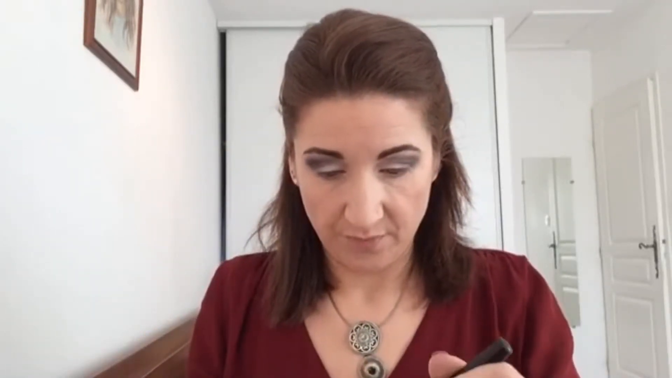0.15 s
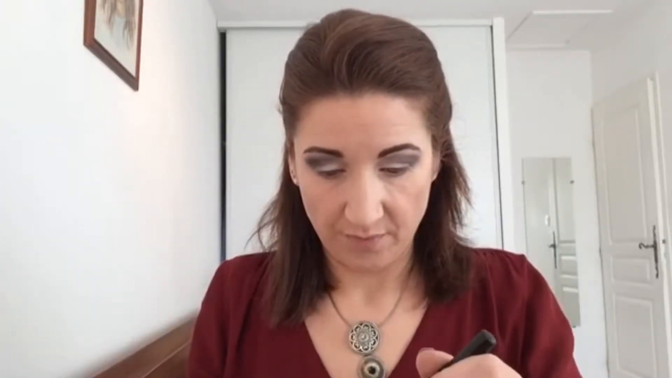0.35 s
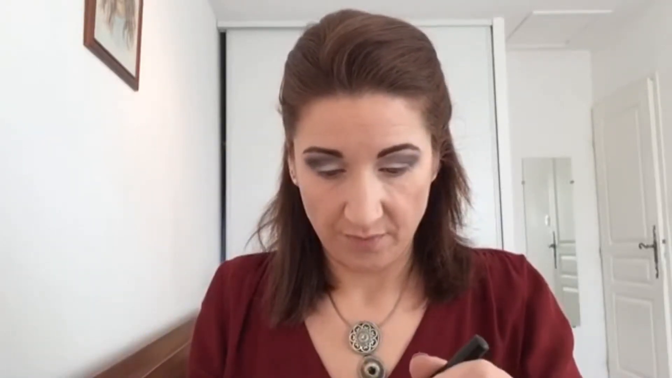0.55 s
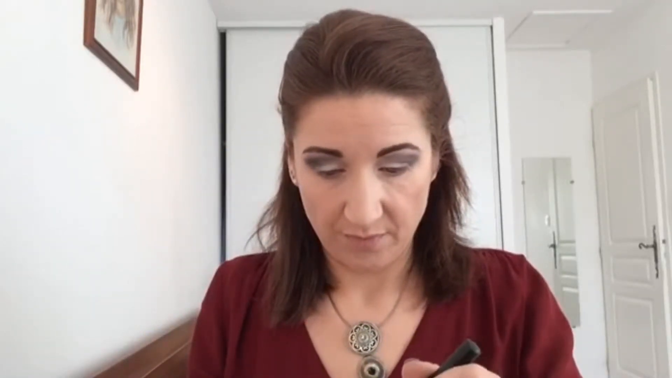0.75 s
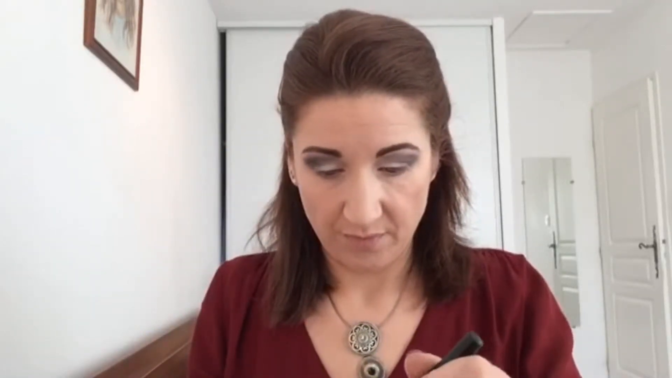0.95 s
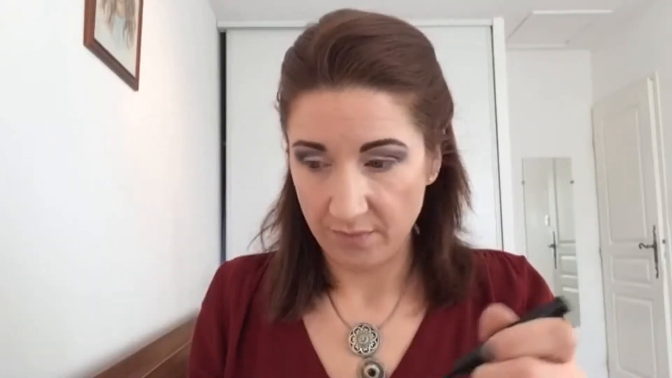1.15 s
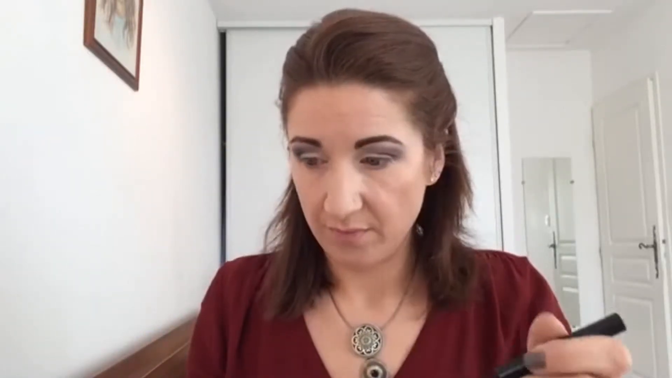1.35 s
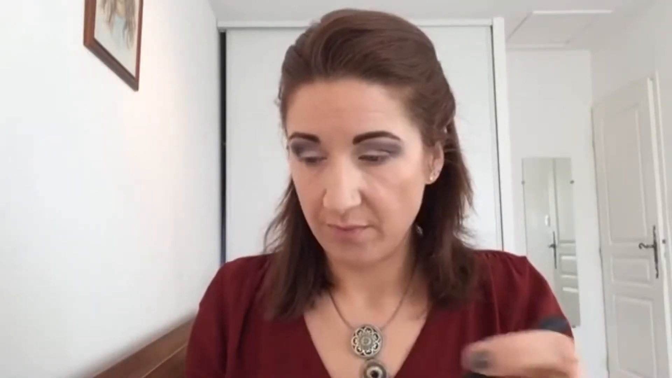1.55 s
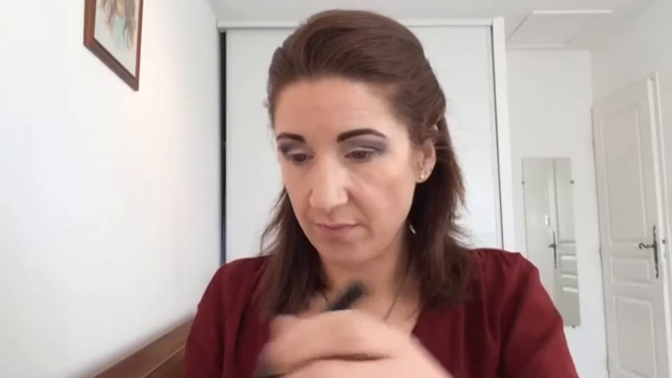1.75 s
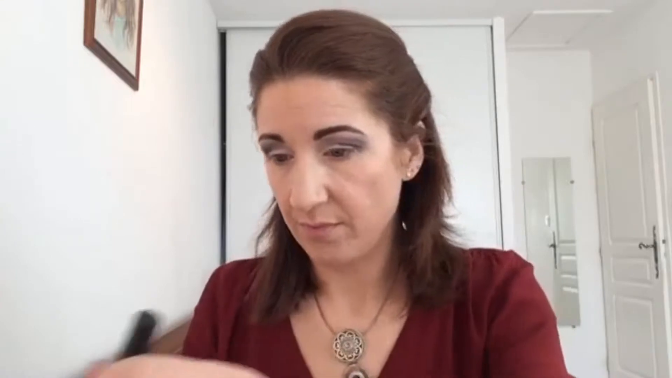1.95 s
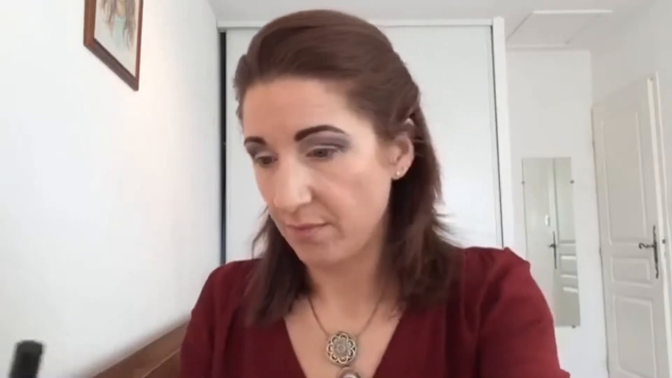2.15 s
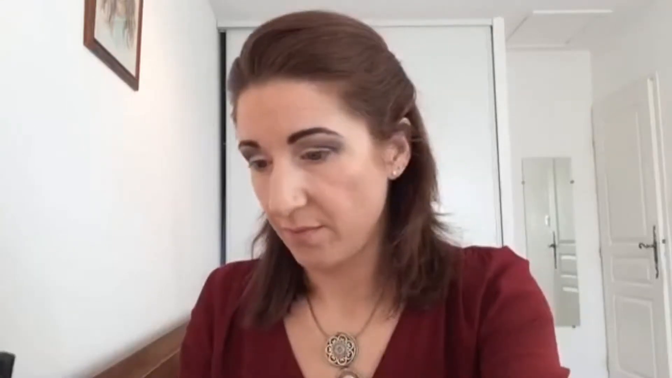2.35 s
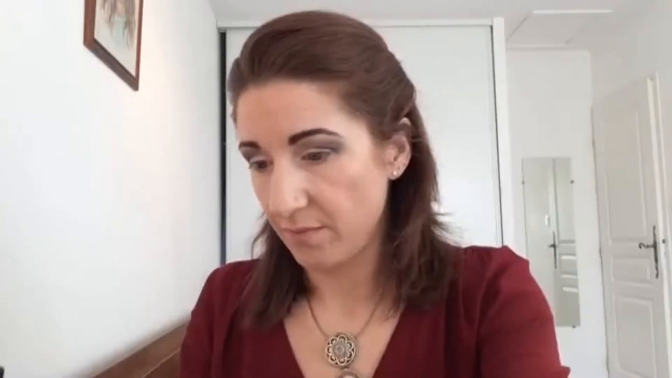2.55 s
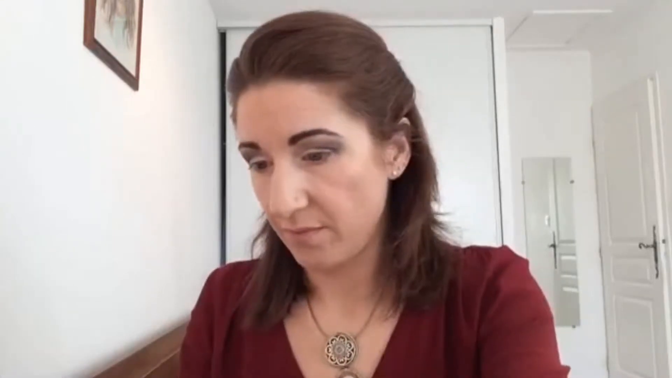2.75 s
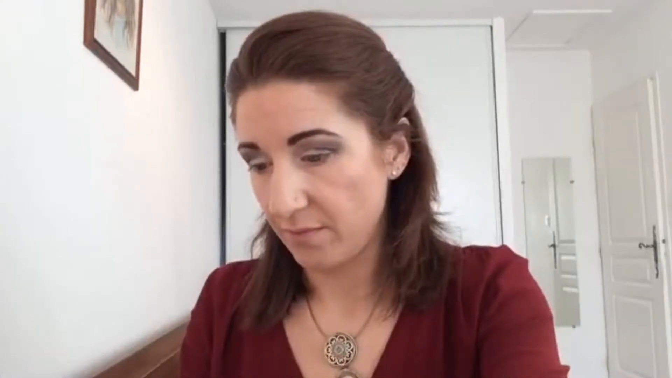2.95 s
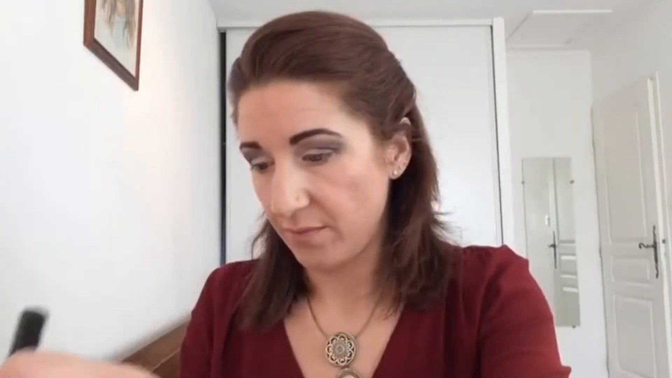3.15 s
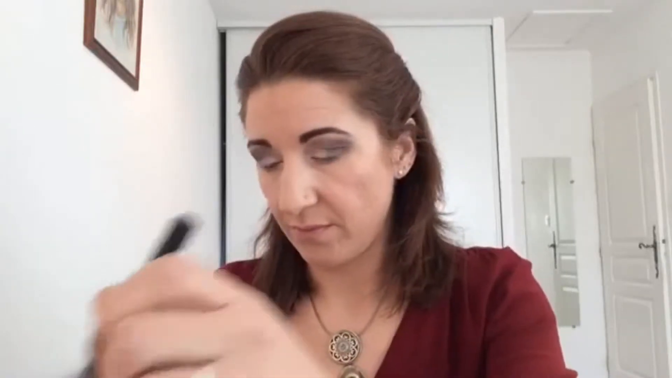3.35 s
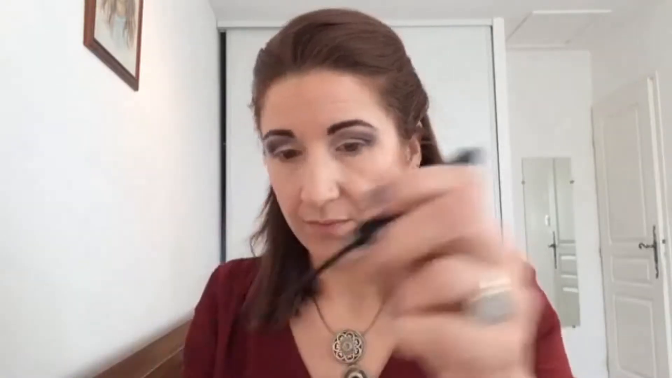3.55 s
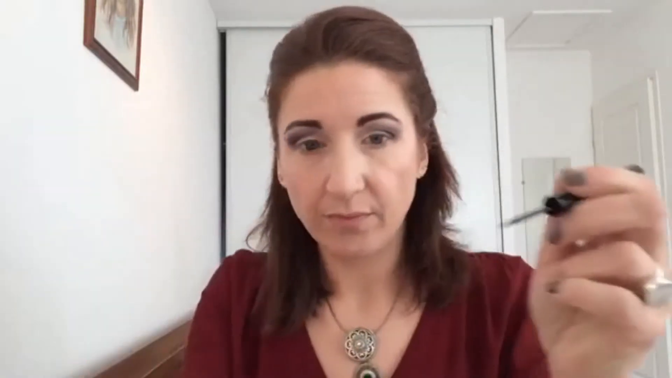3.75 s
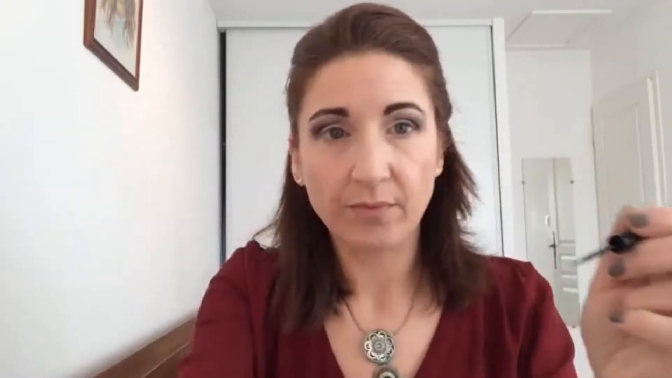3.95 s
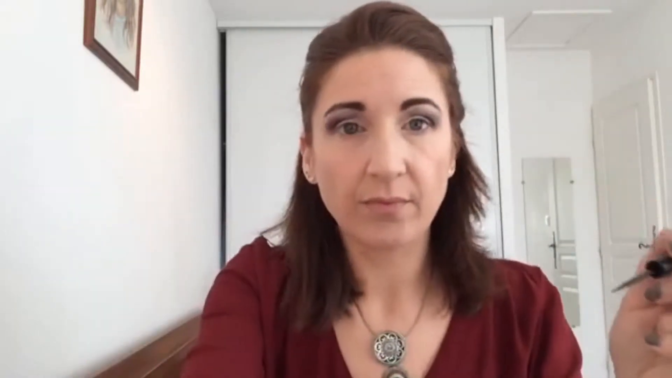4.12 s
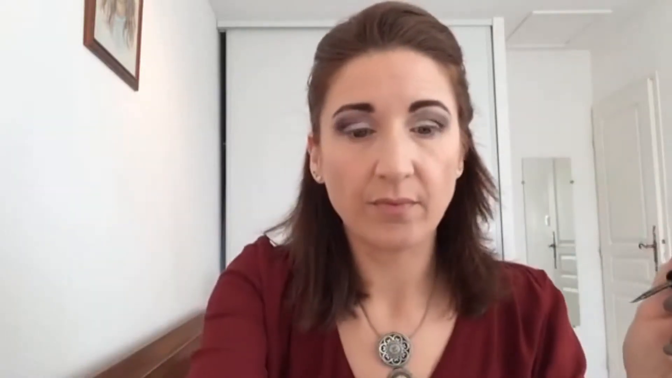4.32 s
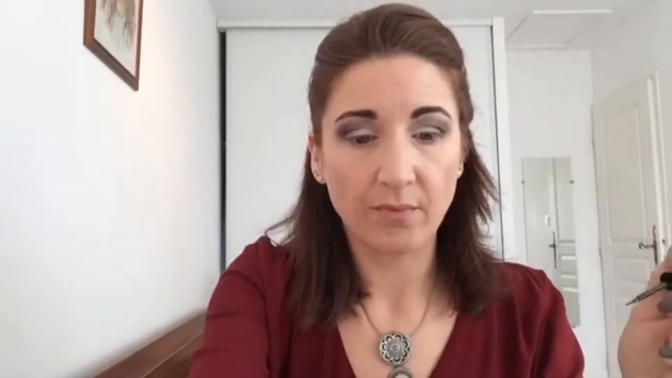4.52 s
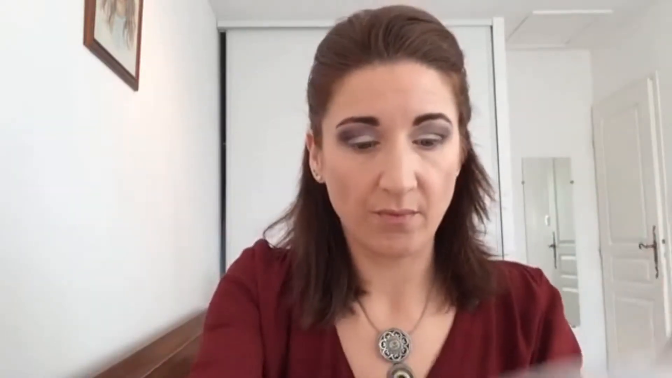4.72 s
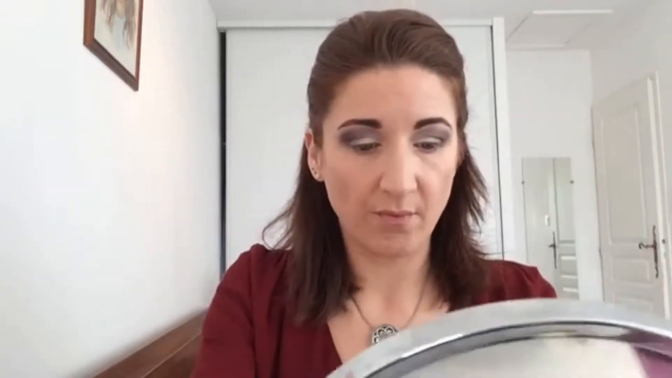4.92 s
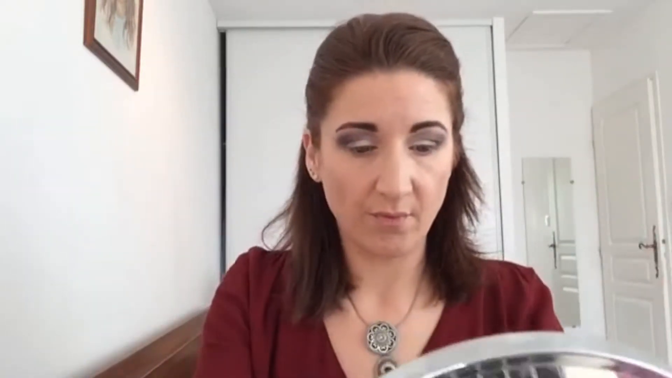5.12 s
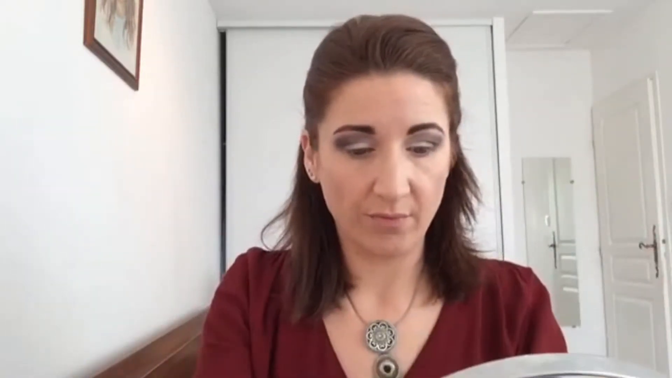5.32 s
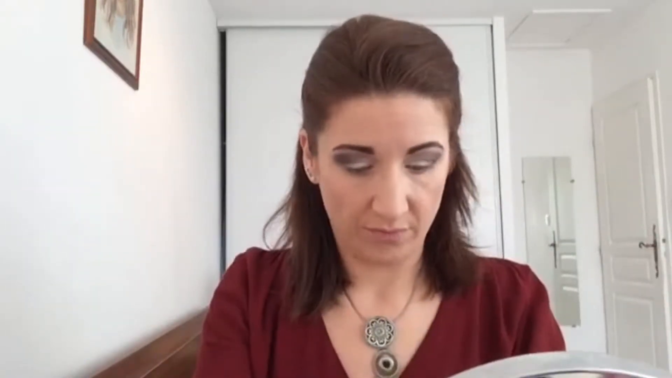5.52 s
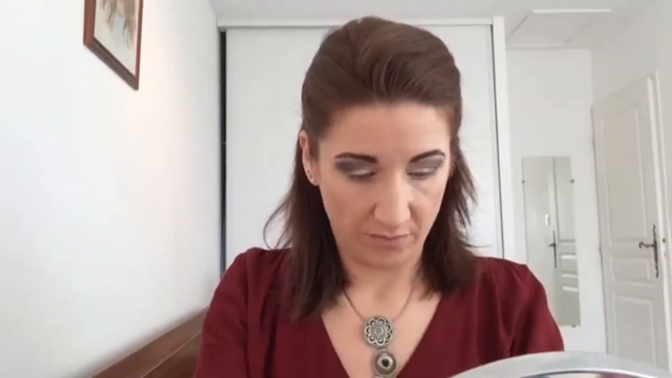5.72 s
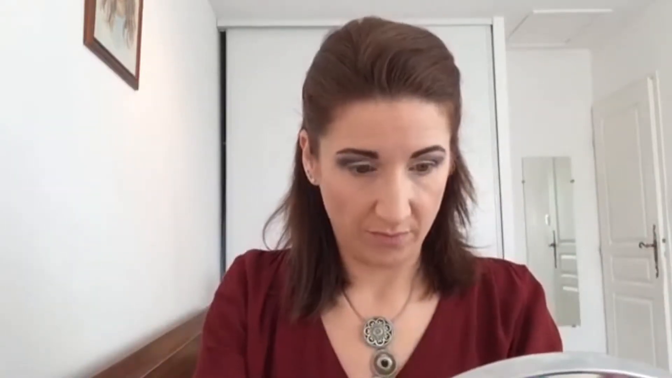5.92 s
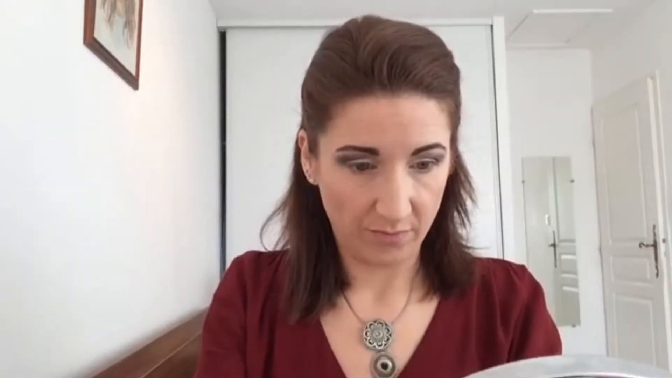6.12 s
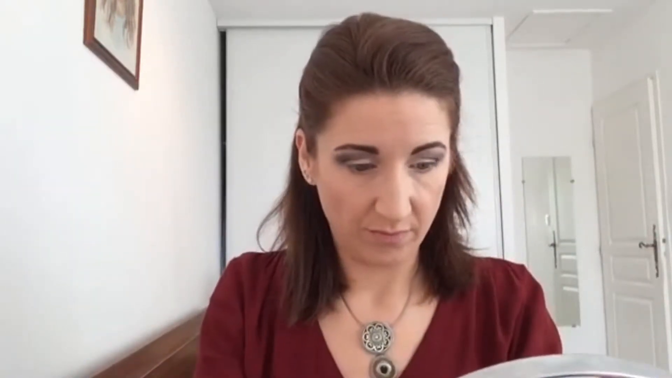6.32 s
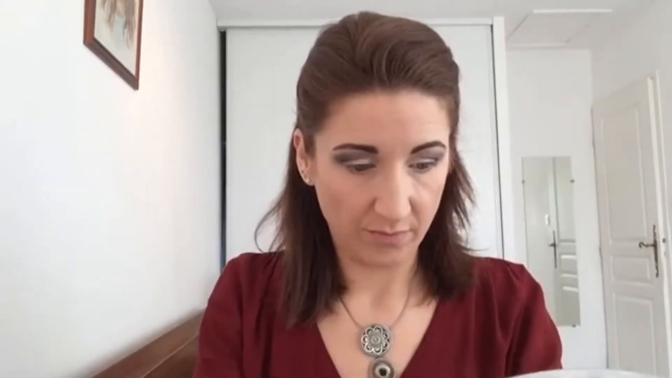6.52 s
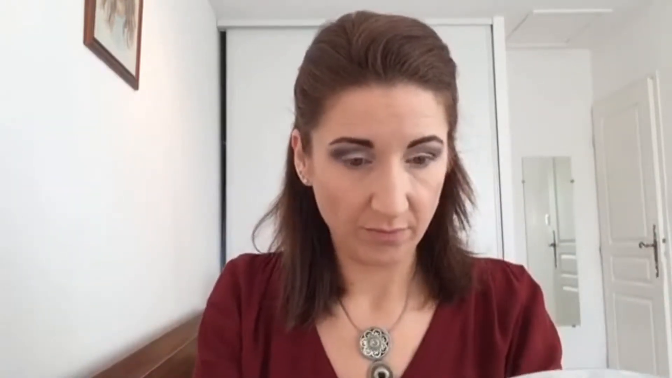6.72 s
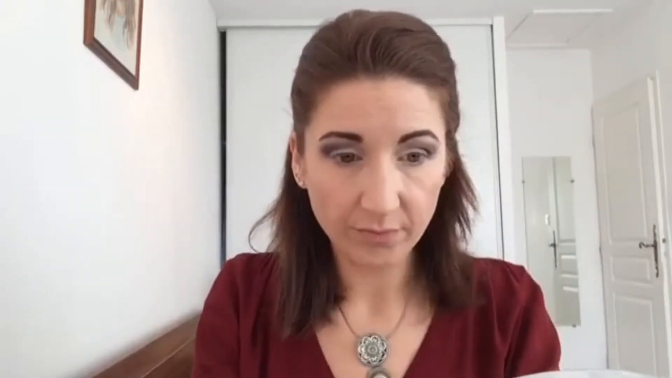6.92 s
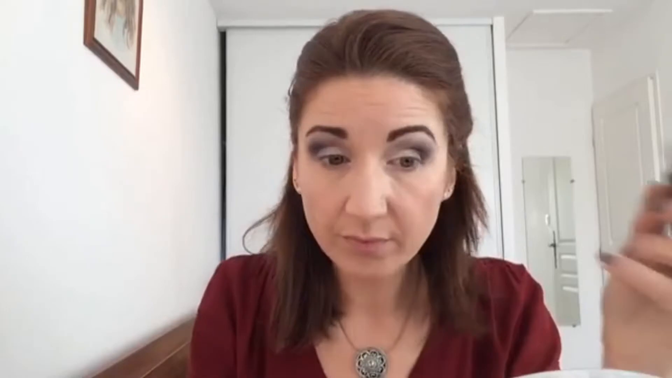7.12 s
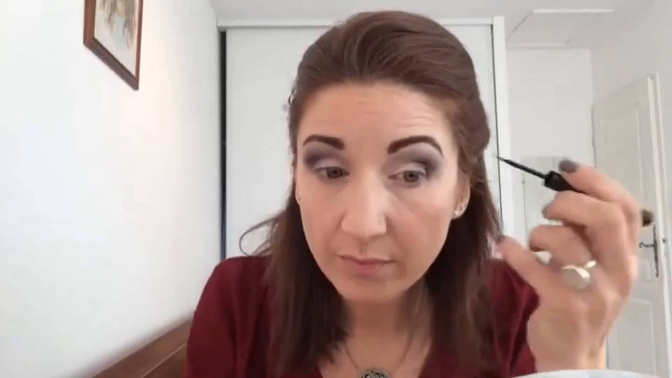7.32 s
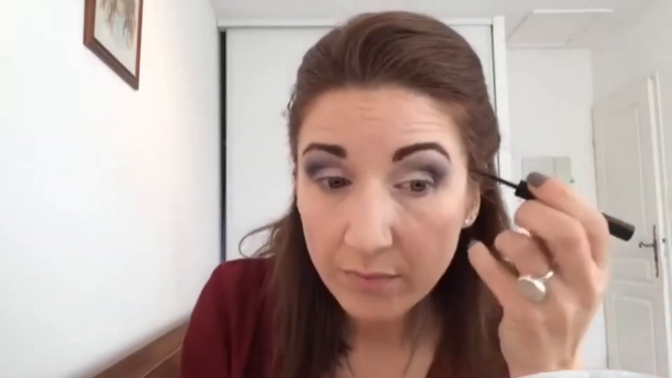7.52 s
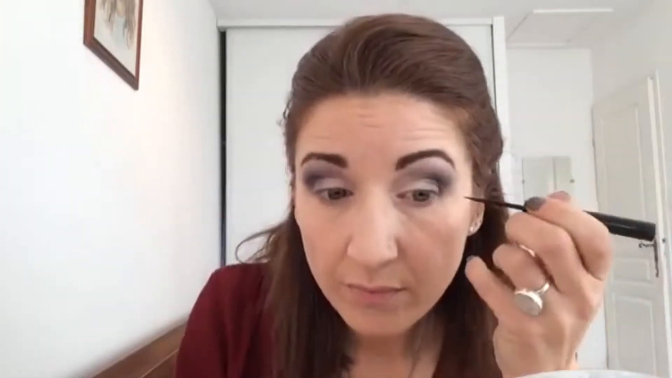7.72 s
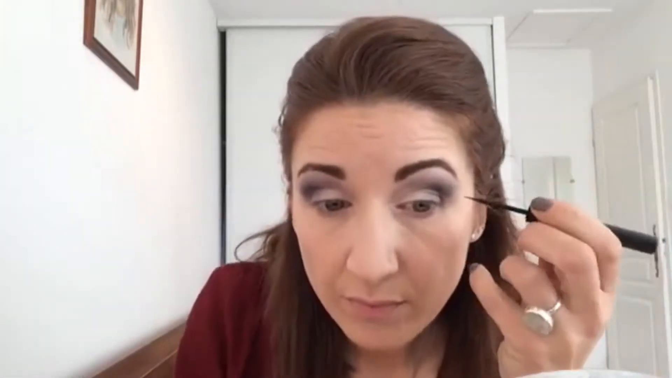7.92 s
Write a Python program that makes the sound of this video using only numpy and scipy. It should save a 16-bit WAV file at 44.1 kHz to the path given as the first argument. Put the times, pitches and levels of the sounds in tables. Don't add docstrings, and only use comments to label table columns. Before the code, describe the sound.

A quiet indoor room with steady soft fan air and a faint thin electronic whine. A small plastic cap pops off a cosmetic tube, loud and hollow, with a short room tail. After a pause, small items knock and scrape on a hollow wooden table, a glass jar chatters, then a stand mirror lands with a thud and is nudged about. Faint taps and low rumbles trail off. Close laptop microphone, slightly dull on top.

```python
import sys
import numpy as np
from scipy import signal
from scipy.fft import rfft, irfft, next_fast_len
from scipy.io import wavfile
from scipy.ndimage import uniform_filter1d, map_coordinates

SR = 44100
rng = np.random.default_rng(int(sys.argv[2]) if len(sys.argv) > 2 else 0)


def magnitude_from_level(level_db):
    exponent = np.asarray(level_db, float) / 20
    return 10 ** exponent


def dump(signal):
    limited = np.clip(np.atleast_2d(signal).T, -1, 1)
    pcm = np.round(limited * 32767).astype(np.int16)
    wavfile.write(sys.argv[1], SR, pcm)


N = 351429

# pitch_hz, level_db (per Hz)
FAN_AIR = [(18, -40), (35, -11), (58, 1), (110, -9.5), (220, -10.5), (500, -13), (800, -10.5),
           (1300, -12.5), (1900, -19), (2400, -25), (4000, -28.5), (8000, -30.5), (12000, -33.5),
           (16000, -30.5)]
FAN_AIR_DB = -66
# pitch_hz, width_hz, level_db, steady_share (0-1)
FAN_TONES = [(441, 6, -85, .3), (732, 10, -78.5, .5), (878, 8, -83.5, .3), (1028, 8, -83.5, .3),
             (7528, 70, -84, .75), (15070, 110, -87, .72)]
# start_s, peak_db
CAP_POP = (1.58713, .7)
# pitch_hz, level_db, t60_s
CAP_RING = [(810, -15, .0124), (1204, -2.6, .0094), (1485, -.5, .0075), (1660, -27, .05),
            (2377, -2.5, .003), (3000, -12, .003)]
# pitch_hz, level_db, t60_s
HAND_RING = [(439, -26, 0.045), (3840, -14.5, 0.0039), (129, -49, 0.17)]
# pitch_hz, level_db, t60_s
FRAME = [(123.2, -4.5, 0.19), (224.6, -6.5, 0.15)]
# pitch_hz, level_db, t60_s
PANEL = [(442, 3.5, 0.027), (572, -6, 0.04)]
# pitch_hz, level_db, t60_s
TOP = [(793, -0.5, 0.03), (960, 3.5, 0.013), (1103, 3, 0.016), (1500, -9, 0.026), (1824, -15.5, 0.038),
       (2380, -34, .02)]
# start_s, top_db, panel_db, hardness_db_per_octave
KNOCKS = [(4.088, -64, -64, 0), (4.157, -36, -60, -2), (4.166, -35, -53, -1), (4.2566, -37.5, -60, 5),
          (4.273, -60, -48, 0), (5.034, -64, -57, 0), (5.243, -33, -32, -8), (5.249, -31, -54, 17),
          (5.264, -36, -42.5, 0), (5.319, -45, -45.5, -4), (5.386, -43.5, -49, -5),
          (5.5036, -49.5, -55.5, -5), (5.734, -60, -62, 0), (5.765, -42, -50, -1), (5.831, -60, -46.5, -6),
          (6.2937, -52, -72, 13), (6.648, -55, -67, 5), (6.707, -52, -59, 2), (6.812, -58, -58, 3),
          (6.86, -52.5, -55.5, -2), (6.977, -64, -56.5, 0), (7.64, -61, -61, 0.5), (7.81, -59, -58, 2),
          (4.198, -60, -53, 0), (4.216, -50, -56, -1), (4.29, -54, -54, 0), (4.476, -65, -64, 0),
           (4.485, -63, -57, 0), (4.549, -64, -58, 0), (5.191, -44, -56, 0), (5.2043, -29, -45, -7),
           (5.2066, -27.5, -48, -6), (5.2089, -37, -47, 3), (5.2101, -33, -55, 8), (5.478, -54, -70, 2),
           (5.666, -49, -70, 3), (5.6705, -60, -48, 2), (5.68, -56, -59, 0), (5.687, -62, -48, 0),
           (5.773, -62, -56, -2), (5.806, -53, -66, 0), (5.8112, -50, -49, 17), (5.997, -60, -56.5, -2),
           (6.155, -43, -47, 4), (6.1637, -51, -68, 3)]
FRAME_UNDER_DB = -19
# start_s, peak_db
THUMPS = [(4.152, -56), (5.191, -33.5), (5.245, -37.5), (5.264, -49), (5.322, -48), (5.386, -58),
          (5.642, -53), (5.8261, -45.5), (6.645, -54.5), (6.706, -59), (6.812, -56.5), (6.86, -58),
          (7.81, -57)]
# start_s, peak_db
SWAYS = [
    (5.194, -32.5),
    (5.255, -36),
    (5.385, -66),
]
# pitch_hz, level_db, t60_s
LEGS = [(52.4, -1.5, 0.21), (79, -2, 0.11)]
# start_s, pitch_hz, peak_db, t60_s
JAR_RING = (4.509, 1724, -44, 0.2)
# most_pressure_s, build_up_s, let_go_s, pressure_db, grip_db
STROKES = [(4.095, 0.028, 0.054, -56.5, -1), (4.118, 0.036, 0.045, -53.5, -10), (4.148, 0.016, .03, -52, 2),
           (4.163, 0.033, 0.027, -44, 2.5), (4.188, 0.022, 0.033, -54, -10), (4.222, 0.034, 0.036, -57, -4),
           (4.268, 0.088, 0.068, -50.5, 0.5), (4.487, 0.045, 0.037, -60.5, -1), (4.55, .03, 0.054, -64, -8),
           (5.036, .02, 0.047, -71, 0), (5.235, 0.034, .03, -57, 5), (5.27, 0.059, 0.045, -55, -4),
           (5.33, .035, 0.11, -57, 3), (5.435, 0.051, 0.12, -58.5, -0.5), (5.504, .012, 0.048, -58.5, 0),
           (5.67, 0.014, .06, -58, 0.5), (5.742, 0.016, 0.037, -60.5, -5), (5.803, .04, 0.019, -57.5, -3),
           (5.833, 0.018, 0.049, -61, 2.5), (5.996, 0.079, 0.065, -61.5, -5), (6.642, .012, 0.12, -65, -1)]
# pitch_hz, level_db (per Hz)
RASP = [(1200, -32), (1800, 4), (2900, -3.5), (4300, -4), (5500, -17.5), (8000, -18)]
# pitch_hz, level_db (per Hz)
HISS = [(4000, -19), (6300, 3), (9000, 1), (12000, -4), (15500, 1.5)]
RASP_DB, HISS_DB, HISS_GRIP = -9, -15, 0.66
FADE_DB, ROUND = 23.5, 1.33
# loudest_s, build_up_s, let_go_s, level_db
RUSTLES = [
    (1.216, .06, .12, -75),
    (1.35, .03, .08, -80),
    (3.92, .06, .06, -76),
    (5.07, .12, .06, -73.5),
    (5.3, .06, .12, -68),
    (5.49, 0.098, 0.045, -69),
    (6, .08, .1, -73),
    (6.1, 0.065, 0.033, -76),
    (6.59, .02, .05, -72),
]
# heaviest_s, build_up_s, let_go_s, rumble_db
LEANS = [(2.05, 0.09, 0.16, -68), (2.4, 0.11, .05, -75), (4.118, 0.05, 0.17, -55), (4.26, 0.09, 0.154, -62),
         (4.48, 0.076, .06, -64), (4.7, 0.084, 0.045, -68.5), (5.3, .02, 0.06, -54),
         (5.4, 0.33, 0.46, -61.5), (5.65, 0.055, 0.15, -60.5), (5.85, 0.081, 0.2, -60.5),
         (6.25, 0.3, 0.18, -65.5), (6.7, 0.2, 0.54, -63), (6.92, .3, .12, -70), (7.1, 0.16, 0.29, -71),
         (7.39, .04, 0.17, -70), (7.65, .17, .09, -66), (7.81, 0.051, .2, -64)]
# pitch_hz, t60_s
ROOM_DECAY = [(120, 0.9), (500, 0.331), (1200, 0.49), (3000, 0.43), (5000, 0.34), (8000, 0.27),
              (16000, 0.069)]
# start_s, peak_db, centre_hz, width_hz
TICKS = [(4.143, -57, 8000, 6000), (4.15, -46, 9300, 1500), (4.155, -44, 2250, 600),
         (4.157, -45, 3200, 2500), (4.164, -49, 4000, 2500), (4.169, -43, 2080, 1200),
         (4.259, -49, 2200, 2500), (4.274, -56, 6700, 1200), (4.288, -51, 9000, 7000),
         (4.311, -58, 6000, 7000), (4.658, -60, 9000, 8970), (5.036, -58.5, 8000, 9000),
         (5.1856, -43, 1500, 1200), (5.191, -39, 4300, 4000), (5.190, -37, 2180, 1200),
         (5.207, -39, 6500, 8950), (5.2105, -44, 3200, 1200), (5.2234, -38, 6500, 4000),
         (5.2258, -35, 7250, 2500), (5.2272, -48, 10500, 5000), (5.2457, -46, 12000, 5000),
         (5.2484, -38, 7800, 8000), (5.370, -54.5, 10940, 8000), (5.4775, -55, 7000, 8000),
         (5.5, -54, 10000, 3000), (5.503, -49, 9500, 8000), (5.6426, -39.5, 9400, 9000),
         (5.643, -35, 6280, 2190), (5.735, -56, 8000, 8000), (5.763, -47, 8000, 10000),
         (5.7642, -51.5, 3020, 3000), (5.81, -43.5, 8100, 3480), (5.8104, -48, 2000, 1200),
         (5.8107, -47, 3500, 2000), (5.8125, -47, 6000, 1200), (5.828, -61, 3200, 1500),
         (6.1462, -60, 14500, 4000), (6.146, -48, 3200, 600), (6.1465, -50.5, 4700, 900),
         (6.1466, -55, 11500, 3000), (6.147, -47.5, 9200, 2000), (6.592, -63, 5800, 1800)]
# start_s, peak_db, centre_hz, width_hz
SNAP = (5.2491, -37, 4300, 2500)
TICK_RISE_S, TICK_T60_S, SNAP_QUICKER = 0.00052, 0.015, 2.5
# start_s, end_s, level_db
SQUEAK = (3.856, 3.91, -56)
# pitch_hz, width_hz, level_db
NECK = [(900, 120, 8), (1930, 300, -12), (3050, 300, -15.5), (3700, 400, -30), (4400, 600, -12),
        (6000, 6700, -23), (9300, 500, -13), (12400, 300, -24)]
# pitch_hz, level_db
MICROPHONE = [(20, -8.5), (45, 0), (12000, 0), (15700, -4.5), (16450, -35)]
# pitch_hz, level_db, t60_s
FOOT = [(490, -29.3, .052), (799, -31.7, .053), (891, -18.6, .016), (1106, -16.5, .019),
        (1461, -22.5, .009), (1770, -22.6, .007), (2130, -15.9, .005)]
# pitch_hz, level_db, t60_s
CASE = [(447, -38, .045), (699, -42.2, .03), (900, -29.3, .018), (1104, -17.1, .014), (1329, -16.2, .008),
        (1733, -7.7, .005), (3250, -31, .006)]
# pitch_hz, level_db, t60_s
CLASP = [(3420, -13.5, 0.0035), (2500, -20, 0.0046), (4300, -20, 0.0037)]
# pitch_hz, level_db, t60_s
HEEL = [(215, -40, .035), (135, -48, 0.051)]
# pitch_hz, level_db, t60_s
EDGE = [(753, -33, 0.035), (1120, -27, .016), (1215, -30.5, 0.015), (1920, -41, 0.014), (2900, -38, 0.0093)]
# pitch_hz, level_db, t60_s
BOOM = [(463, -16.5, 0.037)]
# pitch_hz, level_db, t60_s
WRIST = [(78, -55, .25), (148, -64.5, 0.35), (198, -63, .3), (260, -53, 0.21)]
# start_s, attack_s, direction (+1 or -1), modes
BLOWS = [
    (1.965, .015, 1, WRIST),
    (5.643, .0012, -1, EDGE),
    (5.6438, .0048, 1, BOOM),
    (5.19015, .00026, -1, FOOT),
    (6.14663, .002, 1, CASE),
    (4.1098, .001, -1, HEEL),
    (5.2263, .0003, 1, CLASP),
]
# loudest_s, build_up_s, let_go_s, level_db
SKIDS = [
    (4.509, 0.018, .006, -51),
    (4.517, 0.014, 0.017, -41),
    (4.55, .03, .03, -74),
]
# start_s, peak_db, hardness_db_per_octave
HOPS = [
    (4.481, -62, -6),
    (4.494, -57, -14),
    (4.503, -45, -6),
    (4.5108, -36, 4),
    (4.516, -32, 7.5),
    (4.5194, -42, 1),
    (4.5242, -32, 5),
    (4.5275, -41, -6),
]
# pitch_hz, level_db, t60_s
GLASS = [(856, 2.5, 0.018), (1000, 1, 0.027), (1440, 0.5, 0.018), (1720, 0.5, 0.021), (2160, 0, 0.015),
         (2880, 1, 0.0087), (3420, -0.5, 0.0054), (4650, -4, 0.004)]
RIM_DB = -9.5
# pitch_hz, level_db
SPREAD = [(100, 5), (450, 3), (800, 2.5), (1180, -4.5), (1550, -6), (1950, 0), (3600, 0), (6000, 1.5),
          (10000, 2.5)]
# loudest_s, build_up_s, let_go_s, level_db
SHUDDERS = [
    (1.81, 0.043, 0.038, -63),
    (5.335, 0.046, 0.057, -58.5),
    (5.42, .05, 0.097, -56.5),
    (5.465, 0.068, 0.054, -61),
    (5.69, .03, .04, -68),
    (5.98, 0.037, .03, -63.5),
]
# pitch_hz, level_db, t60_s
FELT = [(837, 1, 0.025), (1070, 3.5, 0.02), (1320, -1, .025), (1610, -12, .02)]


def unit(x):
    return x / np.sqrt(np.mean(x ** 2) + 1e-20)


def along(points, hz):
    f, v = np.transpose(points)
    return np.interp(np.log(hz + 1), np.log(f + 1), v)


def filtered(x, response):
    m = next_fast_len(len(x) + 8192)
    return irfft(rfft(x, m) * response(np.fft.rfftfreq(m, 1 / SR)), m)[:len(x)]


def peak(f, hz, width):
    return 1j * f * width / (hz * hz - f * f + 1j * f * width)


def body(modes, damping):
    return lambda f: sum((-1) ** k * magnitude_from_level(db) * peak(f, hz, damping * 2.2 / t60)
                         for k, (hz, db, t60) in enumerate(modes))


def tilted(modes, db_per_octave, pivot_hz):
    return [(hz, db + db_per_octave * np.log2(hz / pivot_hz), t60) for hz, db, t60 in modes]


def ring(modes, t, attack, scatter_db):
    chance = rng.standard_normal(len(modes))
    tones = sum(magnitude_from_level(db + scatter_db * c - 60 * t / t60) * np.sin(2 * np.pi * hz * t)
                for (hz, db, t60), c in zip(modes, chance))
    return tones * (1 - np.exp(-t / attack)) ** 2


def add(track, s, sound):
    part = track[round(s * SR):][:len(sound)]
    part += sound[:len(part)]


def gains(gestures):
    t = np.arange(N) / SR
    power = np.zeros(N)
    for s, rise, fall, db in gestures:
        near = slice(round((s - 3 * rise) * SR), round((s + 3 * fall) * SR))
        u = np.maximum((s - t[near]) / rise, (t[near] - s) / fall)
        power[near] += magnitude_from_level(2 * (db - FADE_DB * u ** ROUND))
    return uniform_filter1d(np.sqrt(power), size=120)


def grit(rate, spread_db, bed):
    happens = rng.random(N) < rate / SR
    size = magnitude_from_level(spread_db * np.clip(rng.standard_normal(N), -2, 2))
    slips = happens * size * np.clip(rng.standard_normal(N), -2, 2)
    return unit(unit(slips) + bed * rng.standard_normal(N))


def wobble(rate):
    knots = rng.standard_normal(int(N * rate / SR) + 4)
    return map_coordinates(knots, [np.arange(N) * rate / SR])


def laptop():
    air = unit(filtered(rng.standard_normal(N), lambda f: magnitude_from_level(along(FAN_AIR, f))))
    out = magnitude_from_level(FAN_AIR_DB + 0.13 * wobble(1.63)) * air
    for hz, width, db, steady in FAN_TONES:
        drifting_hz = hz + 0.24 * width * wobble(13)
        line = np.sqrt(2) * np.sin(2 * np.pi * np.cumsum(drifting_hz) / SR)
        fuzz = unit(filtered(rng.standard_normal(N), lambda f: peak(f, hz, width) ** 2))
        out = out + magnitude_from_level(db) * (np.sqrt(steady) * line + np.sqrt(1 - steady) * fuzz)
    return out


def room(x, delay, early_db):
    hz, t, z = signal.stft(rng.standard_normal(SR // 2), SR, nperseg=128)
    shape = magnitude_from_level(-60 * t / along(ROOM_DECAY, hz)[:, None]) + magnitude_from_level(early_db - 60 * t / 0.048)
    tail = signal.istft(z * shape, SR, nperseg=128)[1]
    late = np.pad(x, (round(delay * SR), 0))
    return signal.fftconvolve(late, tail / np.linalg.norm(tail))[:N]


def leaning():
    frame = body([(125.7, -5.5, 0.21), (223.0, -9.5, 0.091), (253.0, -10.5, 0.041)], damping=2.3)
    return gains(LEANS) * unit(filtered(rng.standard_normal(N), lambda f: frame(f) / (1 + (f / 400) ** 4)))


def cap():
    start, db = CAP_POP
    out, t = np.zeros(N), np.arange(SR // 4) / SR
    add(out, start, magnitude_from_level(db) * -ring(CAP_RING + HAND_RING, t, attack=.000425, scatter_db=0))

    lead = t[:300]
    until = lead - lead[-1]
    creak = filtered(rng.standard_normal(len(lead)), lambda f: peak(f, 1800, 1050) ** 2)
    creak = creak * magnitude_from_level(-21 + 3000 * until) * (1 - np.exp(until / 0.00024))
    add(out, start - lead[-1], magnitude_from_level(db) * creak)
    out = filtered(out, lambda f: (1 - .5 * np.abs(peak(f, 230, 132)) ** 2) / (1 + (f / 7000) ** 6))

    crack = filtered(rng.standard_normal(len(t)), lambda f: .6 + 0.76 * peak(f, 6020, 5000))
    crack = crack * magnitude_from_level(-44 - 60 * t / 0.014) * (1 - np.exp(-t / .0004))
    add(out, start, magnitude_from_level(db) * crack)
    return out


def squeak():
    start, end, db = SQUEAK
    stroke = np.sin(np.pi * np.clip((np.arange(N) / SR - start) / (end - start), 0, 1))
    neck = lambda f: sum((-1) ** k * magnitude_from_level(level) * peak(f, hz, width) for k, (hz, width, level) in enumerate(NECK))
    return magnitude_from_level(db) * stroke * unit(filtered(rng.standard_normal(N), neck))


def shudder():
    return gains(SHUDDERS) * unit(filtered(grit(900, 2.8, bed=1.0), body(FELT, damping=1.9)))


def skid():
    slips = grit(1900, 1.5, bed=1.3)
    glass = unit(filtered(slips, body(GLASS, damping=1.6)))
    rim = unit(filtered(slips, lambda f: peak(f, 6300, 5300) ** 2 / (1 + (f / 12500) ** 8)))
    out = gains(SKIDS) * (glass + magnitude_from_level(RIM_DB) * rim)
    t = np.arange(SR // 16) / SR
    for s, db, tilt_db in HOPS:
        add(out, s, magnitude_from_level(db - 7.5) * ring(tilted(GLASS, tilt_db, 1700), t, attack=0.00015, scatter_db=2.0))
    return filtered(out, lambda f: 1 / (1 + (600 / (f + 1)) ** 4))


def dragging():
    wood = unit(filtered(grit(1800, 5.4, bed=1.2), body([(487, 1, 0.054)] + TOP, damping=2.05)))
    rasp = unit(filtered(grit(1200, 3.9, bed=0.8), lambda f: magnitude_from_level(along(RASP, f))))
    hiss = unit(filtered(grit(3000, 3.3, bed=1.5), lambda f: magnitude_from_level(along(HISS, f)) * (f > 3000)))

    def share(under_db, grows):
        return [(s, rise, fall, db + under_db + grows * grip) for s, rise, fall, db, grip in STROKES]

    out = gains(share(0, 0)) * wood
    out = out + gains(share(RASP_DB, 1)) * rasp
    return out + gains(share(HISS_DB, HISS_GRIP) + RUSTLES) * hiss


def ticks():
    out, t = np.zeros(N), np.arange(SR // 16) / SR
    for (s, db, hz, width), speed in [(row, 1) for row in TICKS] + [(SNAP, SNAP_QUICKER)]:
        shape = magnitude_from_level(-60 * speed * t / TICK_T60_S) * (1 - np.exp(-speed * t / TICK_RISE_S)) ** 2
        edge = lambda f: (peak(f, hz, width) ** 2 + 0.27 * peak(f, 4900, 3400)) / (1 + (f / 14000) ** 4)
        burst = filtered(rng.standard_normal(len(t)) * shape, edge)
        add(out, s, magnitude_from_level(db) * burst / np.abs(burst).max())
    return out


def blows():
    out, t = np.zeros(N), np.arange(SR // 4) / SR
    for s, attack, direction, modes in BLOWS:
        add(out, s, direction * ring(modes, t, attack, scatter_db=0))
    return out


def knocks():
    out, t = np.zeros(N), np.arange(SR // 4) / SR
    for s, top_db, panel_db, tilt_db in KNOCKS:
        wood = magnitude_from_level(top_db - 4.5) * ring(tilted(TOP, tilt_db, 1100), t, attack=0.00025, scatter_db=2.5)
        wood = wood + magnitude_from_level(panel_db + 8.5) * ring(PANEL, t, attack=0.0026, scatter_db=0.8)
        wood = wood + magnitude_from_level(panel_db + FRAME_UNDER_DB) * ring(FRAME, t, attack=0.0019, scatter_db=3.0)
        add(out, s, -wood)
    for s, db in SWAYS:
        add(out, s, magnitude_from_level(db) * ring(LEGS, t, attack=0.0082, scatter_db=0.0))
    for s, db in THUMPS:
        add(out, s, -magnitude_from_level(db) * ring(FRAME, t, attack=0.0024, scatter_db=3.0))

    s, hz, db, t60 = JAR_RING
    flutter = magnitude_from_level(3.7 * wobble(70)[:len(t)])
    tone = np.sin(2 * np.pi * hz * t) * magnitude_from_level(-60 * t / t60) * (1 - np.exp(-t / 0.002))
    add(out, s, magnitude_from_level(db) * flutter * tone)
    return out


def scene():
    pop = cap()
    table = knocks() + blows() + ticks() + dragging() + skid() + squeak() + shudder()
    sent = filtered(pop, lambda f: magnitude_from_level(along(SPREAD, f)))
    aired = filtered(table, lambda f: 1 - 0.25 * np.abs(peak(f, 450, 250)) ** 2)
    pop_room = magnitude_from_level(-12.0) * room(sent, 0.0045, early_db=-3)
    table_room = magnitude_from_level(-14.5) * room(aired, .004, early_db=0.5)
    mix = laptop() + leaning() + pop + pop_room + table + table_room
    return mix[None]


def top_cut(x):
    return signal.sosfilt(signal.butter(12, 16440, fs=SR, output="sos"), x)


def record(dry):
    heard = filtered(dry[0], lambda f: magnitude_from_level(along(MICROPHONE, f)))
    return top_cut(heard[None])


dry = scene()
out = record(dry)
dump(out)
```